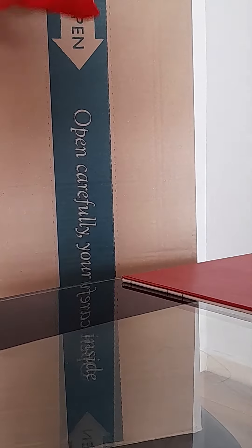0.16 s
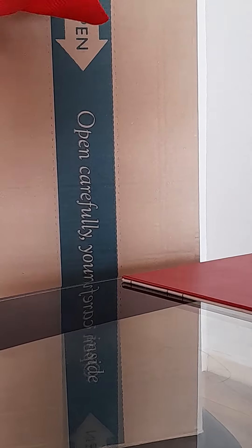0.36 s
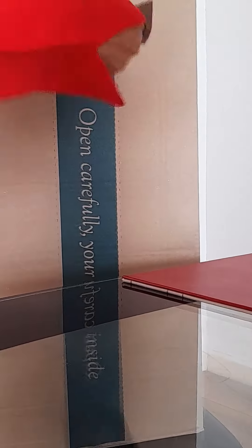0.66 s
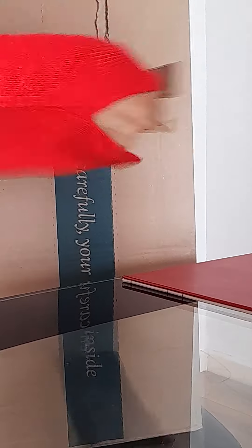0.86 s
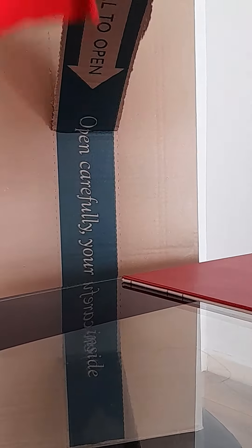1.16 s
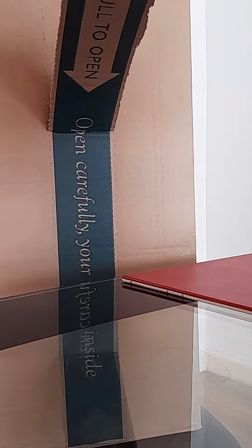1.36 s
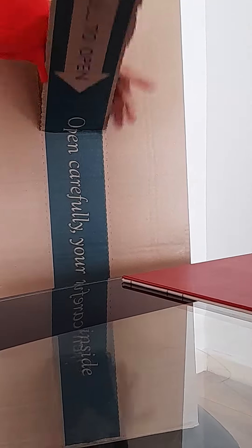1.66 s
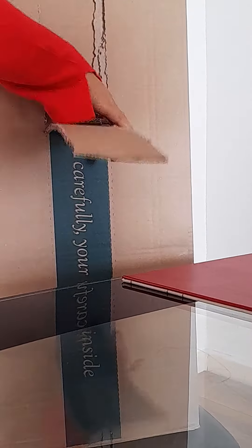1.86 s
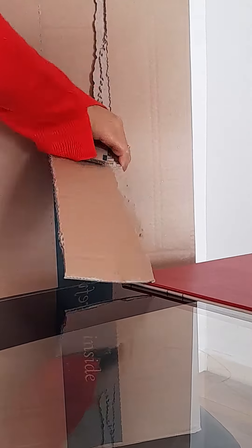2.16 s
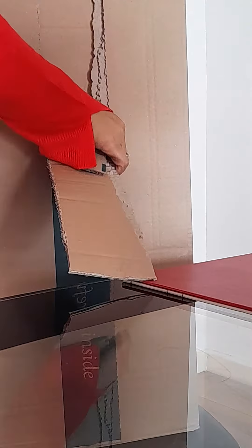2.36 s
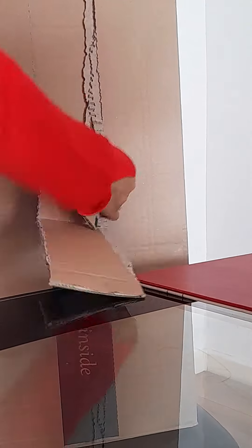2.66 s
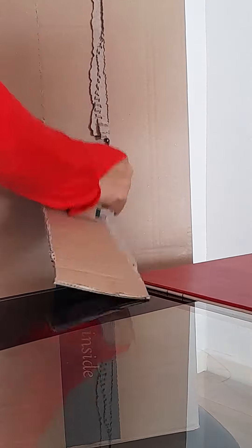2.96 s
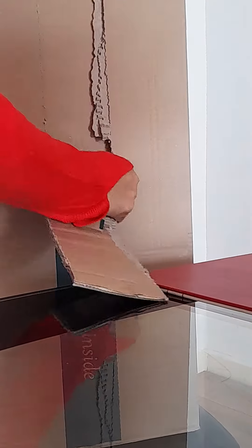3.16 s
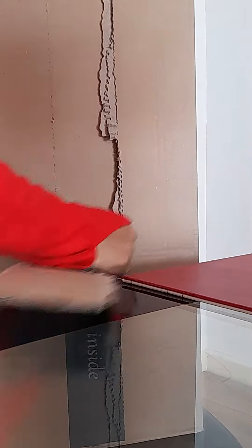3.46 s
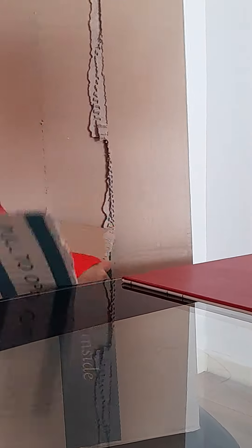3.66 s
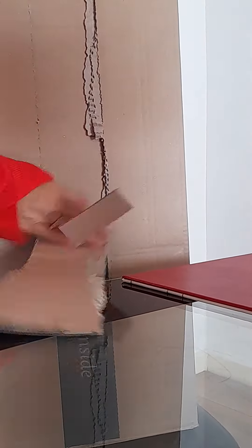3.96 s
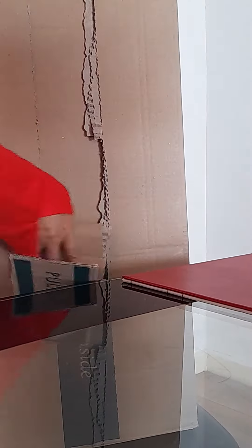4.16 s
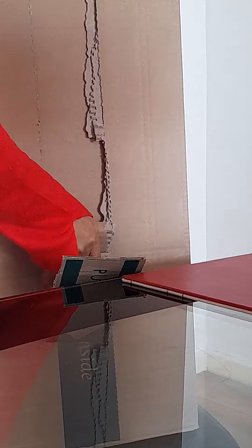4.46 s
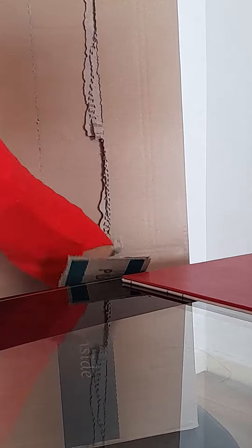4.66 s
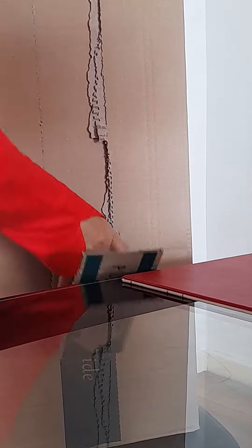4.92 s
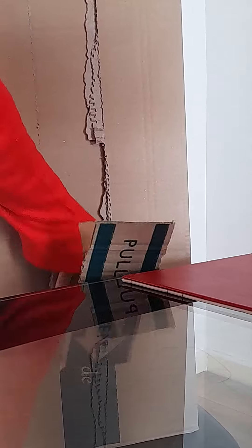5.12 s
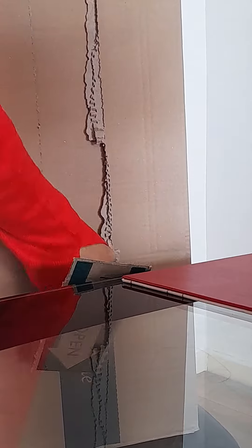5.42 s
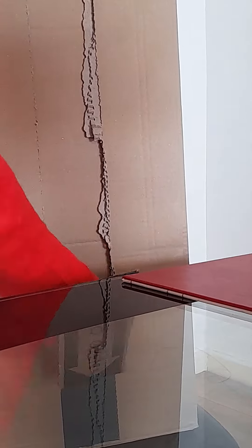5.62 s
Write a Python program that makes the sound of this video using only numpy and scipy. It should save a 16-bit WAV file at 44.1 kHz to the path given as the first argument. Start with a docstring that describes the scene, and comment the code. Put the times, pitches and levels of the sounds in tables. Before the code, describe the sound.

Close up in a bare, slightly echoing room, cardboard rips in three quick bursts, with crackling fibres, snapping tabs and a hollow boom. The tearing pauses while a sleeve and the loose strip brush and tap against the box. Further short rips then come about a second apart, one of them doubled, among knocks, a slap and dull thumps. Soft rubbing ends the sequence.

```python
"""A loud, crackling rip: the tear strip of a big corrugated box, pulled in bursts in a bare, lively room.
Each pull bites, builds, holds and lets go, breaking perforation tabs: fibres crackle, the strip
rattles, the hollow box booms, and tough tabs snap. Between pulls a sleeve and the loose strip brush
over the cardboard and knock against it, and the fold creaks. A phone picks it all up from close by."""
import sys
import numpy as np
from scipy import signal
from scipy.fft import rfft, irfft, next_fast_len
from scipy.io import wavfile
from scipy.ndimage import uniform_filter1d

SR = 44100
rng = np.random.default_rng(int(sys.argv[2]) if len(sys.argv) > 2 else 0)


def write(x):
    x = np.atleast_2d(x).T
    wavfile.write(sys.argv[1], SR, np.round(np.clip(x, -1, 1) * 32767).astype(np.int16))

N = 255339
T = np.arange(N) / SR

# resonances of the strip and of the hollow box: f/Hz, width/Hz, level/dB
STRIP_RESONANCES = [(231.1, 14, 0), (306.4, 14.4, 2.5), (380.3, 41, -3), (423.3, 39, -2), (554, 160, -1),
                    (660, 85, -0.5), (748, 81, -5), (1083, 120, -10)]
BOX_RESONANCES = [(54, 12, -4.5), (78, 8.6, -9.5), (106, 13, -2), (157.3, 63, 1), (175.6, 20, -1)]
# pulls on the strip: t/s, build/s, hold/s, first bite/dB re full force, crackle/dB, rattle/dB, boom/dB,
# tab rate/Hz, crackle tilt/(dB/octave), rasp/Hz, note of the held flap/Hz, flap level/dB
STRIP_PULLS = [(0.048, 0.051, .052, -2.5, -23.5, -25.5, -24, 124, 3.5, 2750, 158, 2.5),
               (.369, 0.037, 0.064, -4, -18, -20, -23.5, 108, 1.5, 2850, 245, 8.5),
               (0.563, 0.092, .12, -2.5, -16.5, -20.5, -19, 108, 1.54, 4000, 241.6, 7.5),
               (2.493, 0.044, 0.036, -50, -15.5, -22.5, -28, 149, 0.4, 1570, 528, -3),
               (3.188, 0.058, 0.031, -8, -16, -18.5, -16, 95, 2.2, 1650, 165, 2.5),
               (3.371, .11, 0.026, -2.5, -30, -34.5, -41.5, 120, 3, 1440, 267, -3),
               (4.492, 0.065, 0.066, -20, -22.5, -18.5, -33.5, 76, 0, 2090, 296, 6.5),
               (5.455, 0.015, 0.039, -16.5, -19.5, -21, -25.5, 130, 0.75, 2130, 644, 4)]
def pull(start_s, build_s, hold_s, bite_db, crackle_db, rattle_db, boom_db,
         tab_hz, tilt_db, rasp_hz, flap_hz, flap_db, flap_width_hz=52, box_swell_s=.024):
    """Tabs break one after another; each sheds fibre clicks and plucks strip and box."""
    drive = effort(start_s, build_s, hold_s, bite_db)
    breaks = pulse_train(tab_hz, jitter=.15, scatter_db=3)
    shedding = unit(bursts(breaks, decay_s=.0016) + .14)  # the liner also peels between tabs
    fibres = shedding * clicks(per_s=9000, spread_db=3)
    force = unit(breaks + .5 * fibres)
    crackle = through(undb(crackle_db) * drive ** 1.11 * fibres, paper_colour(tilt_db))
    # the liner's free edge rasps at a pitch set by the grip
    rasp = signal.lfilter(*signal.iirpeak(rasp_hz, Q=3.5, fs=SR), crackle)
    held_strip = ring(sorted(STRIP_RESONANCES + [(flap_hz, flap_width_hz, flap_db)]))
    rattle = through(undb(rattle_db) * drive * force, held_strip)
    # the heavy walls pick up and lose their motion late
    inertia = np.exp(-1 / (box_swell_s * SR))
    swell = signal.lfilter([1 - inertia], [1, -inertia], drive)
    boom = through(undb(boom_db) * swell * force, ring(BOX_RESONANCES))
    return np.array([.83 * crackle + .5 * rasp, rattle, boom])


def effort(start_s, build_s, hold_s, bite_db, attack_s=.0012, release_db_per_s=330):
    """Envelope of a pull: it bites, builds to full force, holds, and runs out as the arm stops."""
    age = np.maximum(T - start_s, 0)
    build_db = bite_db * np.clip(1 - age / build_s, 0, 1)
    release_db = release_db_per_s * np.maximum(age - build_s - hold_s, 0)
    return (1 - np.exp(-age / attack_s)) * undb(np.maximum(build_db - release_db, -150))


# tone of breaking fibres: f/Hz, level/dB
FIBRE_EQ = [(400, -24), (900, 2), (1300, -4.5), (1620, -2), (2400, -1), (2850, 0), (3500, -8.5),
            (4600, -6.5), (6500, -6), (7700, -14.5), (8800, -15), (12000, -10), (16000, -17)]
def paper_colour(db_per_octave):
    """The response of breaking fibres, tilted about 3 kHz."""
    return colour([(hz, db + db_per_octave * np.log2(hz / 3000)) for hz, db in FIBRE_EQ])


# accents from tough tabs: t/s, crack/dB, jolt to the strip/dB
TAB_SNAPS = [(.068, 9.5, -12), (.112, 17, 13.5), (.149, 7, 7), (0.368, 11.5, 14.5), (.4, 12, 12),
             (0.421, -24, -4), (.675, 9.5, -7), (.784, 13.5, 4), (0.847, 1, -1.5), (2.458, -9, -7.5),
             (2.492, 6, -2), (2.546, 11.5, 5), (3.188, 8.5, 8), (3.217, 2.5, 8), (3.243, 8.5, 14),
             (4.495, 0.5, 6.5), (4.565, -2, 11.5), (4.606, 9, 1), (5.459, -3.5, 5)]
def snaps(box_share_db=-8.5):
    """A tough tab lets go at once, with a short crack and a jolt to strip and box."""
    hits = np.zeros((2, N))
    for s, *db in TAB_SNAPS:
        hits[:, int(s * SR)] = undb(db)
    fractures, jolts = hits
    crack = bursts(fractures, decay_s=.0031) * rng.standard_normal(N)
    return np.array([through(crack, paper_colour(db_per_octave=.33)),
                     through(jolts, ring(STRIP_RESONANCES)),
                     undb(box_share_db) * through(jolts, ring(BOX_RESONANCES))])


# hand and flapping strip knock on small patches of card: t/s, level/dB, f/Hz
CARD_KNOCKS = [(.969, 2, 334), (1.586, -27.5, 356), (1.771, -12, 260), (1.803, -12, 440),
               (2.04, -13.5, 286), (2.544, 11, 543), (3.044, -13.5, 298), (3.722, -1.5, 348),
               (3.964, -2.5, 271), (4.305, -11, 284), (4.567, 7, 283.3), (4.932, -15, 277),
               (4.967, -10, 230), (5.484, 8.5, 350)]
# the arm bumps the broad front wall: t/s, level/dB
ARM_BUMPS = [(1.602, -28), (2.126, -11), (3.615, 0), (3.745, -9.5), (3.975, 3), (4.123, 1.5), (5.254, -8)]
# that wall's drum note: f/Hz, width/Hz, level/dB
WALL_NOTE = [(155, 9.5, 0)]
def knocks(patch_q=5.1, size=11025):
    """A knock rings one damped patch of card, a bump the whole wall; a slap hardly rings at all."""
    patches = [(s, db, [(hz, hz / patch_q, 0)]) for s, db, hz in CARD_KNOCKS]
    bumps = [(s, db, WALL_NOTE) for s, db in ARM_BUMPS]
    slap = (3.493, 5.5, [(1160, 1400, 0)])  # the strip's loose end comes down once
    out = np.zeros(N + size)
    for s, db, modes in patches + bumps + [slap]:
        start = int(s * SR)
        out[start:start + size] += undb(db) * ring(modes, size)
    return out[:N]


# brush strokes of sleeve and strip: t/s, length/s, hiss/dB, rumble/dB
BRUSH_STROKES = [(0.004, .37, -41, -42), (0.783, 0.31, -55, -36), (1.12, 0.12, -64.5, -63.5),
                 (1.596, 0.23, -52.5, -55), (1.76, 0.16, -57, -51), (1.912, 0.29, -50, -51),
                 (2.087, 0.31, -60, -49.5), (2.36, 0.11, -48.5, -43), (2.727, 0.15, -52, -50),
                 (2.876, 0.86, -50.5, -51), (3.01, 0.092, -86, -40.5), (3.517, 0.21, -49, -44),
                 (3.717, 0.17, -48.5, -42.5), (3.875, 0.032, -40, -41.5), (3.934, 0.27, -42, -37),
                 (4.182, 0.21, -46.5, -44), (4.381, 0.38, -44, -43), (4.804, 0.34, -51.5, -47),
                 (5.123, 0.26, -48.5, -44.5), (5.353, 0.29, -42.5, -42.5), (5.71, 0.24, -51, -50)]
# tone of the hiss and of the rumble: f/Hz, level/dB
HISS_EQ = [(400, -23.5), (1000, -2), (2300, 1), (3500, -4), (5800, -0.5), (6800, -1.5), (8300, -10.5),
           (12000, -3), (16000, -11)]
RUMBLE_EQ = [(25, -26), (52, -6.5), (110, -1.5), (155, 0), (195, -7), (245, 0.5), (305, 1.5), (370, -2.5),
             (450, -7), (650, -10.5), (1100, -18.5), (2500, -51)]
def rubbing():
    """Cloth and card slide over the box: fine hiss, and small catches that make the wall rumble."""
    hiss, rumble = sum(np.outer(undb(db), stroke(s, length_s)) for s, length_s, *db in BRUSH_STROKES)
    pressure = undb(2 * unit(uniform_filter1d(rng.standard_normal(N), size=900)))  # uneven contact
    grain = unit(pressure * (rng.standard_normal(N) + .5 * clicks(per_s=600, spread_db=8.5)))
    catches = unit(pressure * (clicks(per_s=350, spread_db=1.5) + .7 * rng.standard_normal(N)))
    return through(hiss * grain, colour(HISS_EQ)), through(rumble * catches, colour(RUMBLE_EQ))


def stroke(start_s, length_s):
    """Envelope of a brush stroke: loudness follows the hand as it speeds up and slows to rest."""
    progress = np.clip((T - start_s) / length_s, 0, 1)
    speed = np.sin(np.pi * progress ** .64)  # fastest before the middle
    return np.abs(speed) ** .57


# single fibres flick free of the ragged edge: t/s, level/dB
FIBRE_TICKS = [(1.118, -30), (1.33, -32.5), (2.371, -25), (2.468, -10), (3.116, -13), (5.363, -4.5),
               (5.377, -17)]
def ticks():
    """A flicking fibre is nearly all treble and too light to shake the box."""
    s, db = np.transpose(FIBRE_TICKS)
    flicks = np.bincount((s * SR).astype(int), undb(db), N)
    spits = bursts(flicks, decay_s=.00084) * rng.standard_normal(N)
    return through(spits, paper_colour(db_per_octave=8))


# fader curve of the creak: t/s, level/dB
CREAK_FADER = [(2.345, -42), (2.354, -40), (2.40, -44), (2.45, -58)]
def creak():
    """The fold sticks and slips as the hand takes up the strain."""
    slips = pulse_train(per_s=140, jitter=1, scatter_db=-2)
    db = np.interp(T, *np.transpose(CREAK_FADER), left=-150, right=-150)
    fader = uniform_filter1d(undb(db), size=220)
    return through(fader * slips, ring([(413, 180, 7), (797, 68, 4.5)]))


# reverb of the bare room: f/Hz, t60/s, wet over dry/dB, stereo width/(0-1)
ROOM_REVERB = [(60, 0.43, -4, 0.15), (150, 0.59, -4, 0.07), (278, 0.33, 0.5, 0), (724, 0.45, 2.5, 0.8),
               (2030, 0.45, 4.5, .95), (5240, 0.38, 7.5, .95), (15400, 0.23, 1, 0.5)]
def room_response(size=32768):
    """Left and right tails: half-octave noise bands, each with its own decay, near mono in the bass."""
    t, hz = T[:size], np.fft.rfftfreq(size, 1 / SR)
    noise = rfft(rng.standard_normal((2, size)))
    build_up = 1 - np.exp(-np.maximum(t - .003, 0) / .0015)
    tails = 0
    for centre in 2 ** np.arange(5, 14.5, .5):
        t60, db, width = on_log_axis(centre, ROOM_REVERB)
        band = np.abs(np.log2(np.maximum(hz, 1) / centre)) < 1 / 4
        mid, side = irfft(noise * band, size) * build_up * np.exp(-np.log(1000) * t / t60)
        mid *= np.sqrt(1 - width / 2) / np.linalg.norm(mid)
        side *= np.sqrt(width / 2) / np.linalg.norm(side)
        tails += undb(db) * np.sqrt(band.mean()) * np.array([mid + side, mid - side])
    return tails


def room(x, patterns=7, crossfade_s=.025):
    """Tear and strip keep moving, so the sound slides from one pattern of reflections to the next."""
    place = T / crossfade_s
    wet = 0
    for k in range(patterns):
        distance = np.abs((place - k + patterns / 2) % patterns - patterns / 2)
        send = x * np.cos(np.pi / 2 * np.minimum(distance, 1))
        wet += signal.oaconvolve(send[None], room_response(), axes=1)[:, :N]
    return wet


# tone of the background: f/Hz, level/dB
BACKGROUND_EQ = [(25, -3), (60, -6), (190, -5), (300, 4.5), (370, -6.5), (800, -1), (1400, -17.5),
                 (5500, -9), (8500, -14.5), (12000, -13.5), (16000, -17)]
def background(level_db=-69):
    """A faint, steady bed of noise, separate in each channel."""
    bed = [through(noise, colour(BACKGROUND_EQ)) for noise in rng.standard_normal((2, N))]
    return undb(level_db) * np.array(bed)


def clicks(per_s, spread_db):
    """Random tiny fractures of very unequal size, rms 1."""
    size = undb(spread_db * np.minimum(rng.standard_exponential(N), 4))
    return unit((rng.random(N) < per_s / SR) * size * rng.standard_normal(N))


def pulse_train(per_s, jitter, scatter_db, count=1400):
    """One impulse for each break or slip, varied in spacing and size, rms 1."""
    timing, strength = rng.standard_normal((count, 2)).T
    at = (np.cumsum(np.exp(jitter * timing)) / per_s * SR).astype(int)
    pulses = np.zeros(N)
    pulses[at[at < N]] = undb(scatter_db * strength[at < N])
    return unit(pulses)


def bursts(pulses, decay_s, size=1024):
    """Envelope that spreads the energy of each impulse over a quick swell and a short decay."""
    fade = np.exp(-2 * T[:size] / decay_s) * (1 - np.exp(-3 * T[:size] / decay_s)) ** 2
    return np.sqrt(np.maximum(through(pulses ** 2, fade / fade.sum()), 0))


def ring(modes, size=11025):
    """Unit-energy response of modes (f/Hz, width/Hz, level/dB); neighbours swing in opposite senses."""
    t = T[:size]
    response = 0
    for k, (hz, width, db) in enumerate(modes):
        decay = undb(db) * np.sqrt(width) * np.exp(-np.pi * width * t)
        response += (-1) ** k * decay * np.sin(2 * np.pi * hz * t)
    # a small panel radiates little below its lowest mode
    low_cut = signal.butter(2, .62 * modes[0][0], "high", fs=SR, output="sos")
    response = signal.sosfilt(low_cut, response)
    return response / np.linalg.norm(response)


def colour(eq, size=2048):
    """Minimum-phase, unit-energy response of an EQ curve (f/Hz, level/dB)."""
    db = on_log_axis(np.fft.rfftfreq(size, 1 / SR), eq)[0]
    cepstrum = irfft(np.log(undb(db)))
    cepstrum[1:size // 2] *= 2
    cepstrum[size // 2 + 1:] = 0
    response = irfft(np.exp(rfft(cepstrum)))
    return response / np.linalg.norm(response)


def on_log_axis(hz, rows):
    """The columns of rows (f/Hz, ..) read at the given frequencies."""
    f, *columns = np.transpose(rows)
    return [np.interp(np.log(np.maximum(hz, 1)), np.log(f), c) for c in columns]


def through(x, response):
    """Convolve with an impulse response."""
    return signal.oaconvolve(x, response)[:N]


def undb(db):
    """Decibels to gain."""
    return 10 ** (np.asarray(db) / 20)


def unit(x):
    """Scale to rms 1."""
    return x / np.sqrt(np.mean(x ** 2))


# stereo balance: f/Hz, left minus right/dB
STEREO_BALANCE = [(130, -1.4), (280, -3.5), (1000, -5), (4500, -3.5), (8000, -2.5), (14000, -1)]
def scene(right_lag_s=.00053):
    """Box and hand up close, a little louder on the right, in the room over a faint background."""
    fibres, strip, box = sum(pull(*row) for row in STRIP_PULLS) + snaps()
    hiss, rumble = rubbing()
    paper = fibres + hiss + ticks()
    body = strip + box + rumble + knocks() + creak()
    # the small tearing point reaches the left mic first; the broad walls reach both together
    direct = np.array([paper + body, np.interp(T - right_lag_s, T, paper) + body])
    mix = direct + room(paper + body)
    size = next_fast_len(N)
    hz = np.fft.rfftfreq(size, 1 / SR)
    balance = undb(np.outer([.5, -.5], on_log_axis(hz, STEREO_BALANCE)[0]))
    wet_db = on_log_axis(hz, ROOM_REVERB)[1]
    tone = balance / np.sqrt(1 + undb(wet_db) ** 2)  # direct sound and room share the power
    return irfft(rfft(mix, size) * tone, size)[:, :N] + background()


def record(dry, bottom_hz=42, top_hz=15900):
    """The phone drops the deepest bass, rounds the highest peaks and cuts the top."""
    low_cut = signal.butter(4, bottom_hz, "high", fs=SR, output="sos")
    high_cut = signal.ellip(10, .2, 70, top_hz, fs=SR, output="sos")
    return signal.sosfilt(high_cut, np.tanh(signal.sosfilt(low_cut, dry)))


dry = scene()
out = record(dry)
write(out)
```